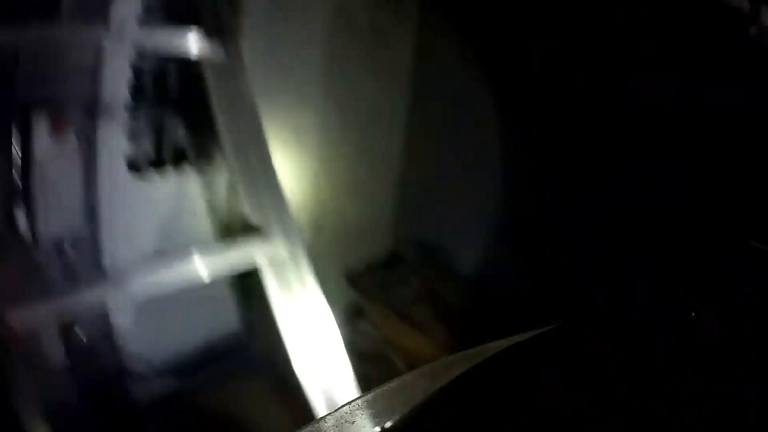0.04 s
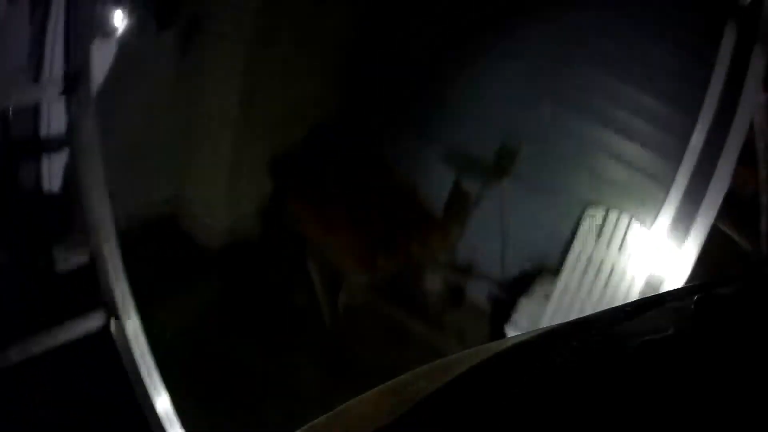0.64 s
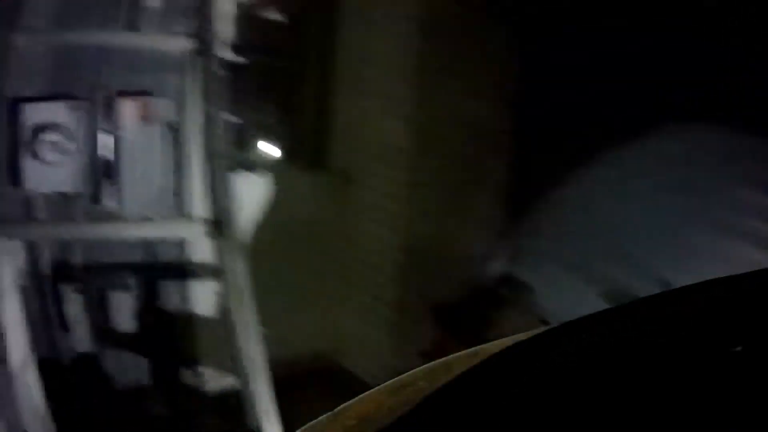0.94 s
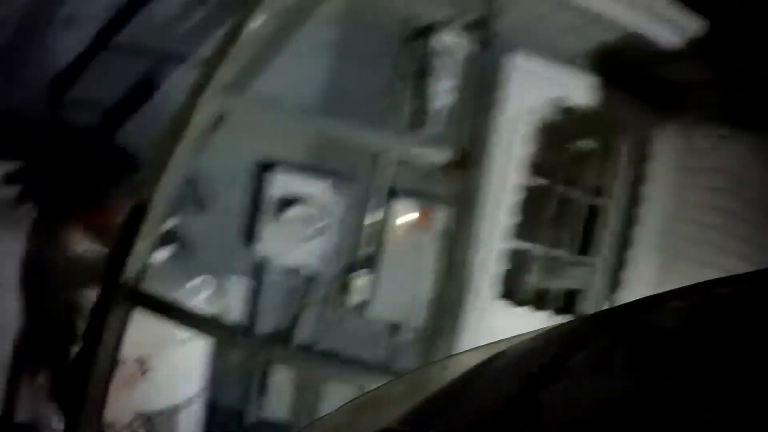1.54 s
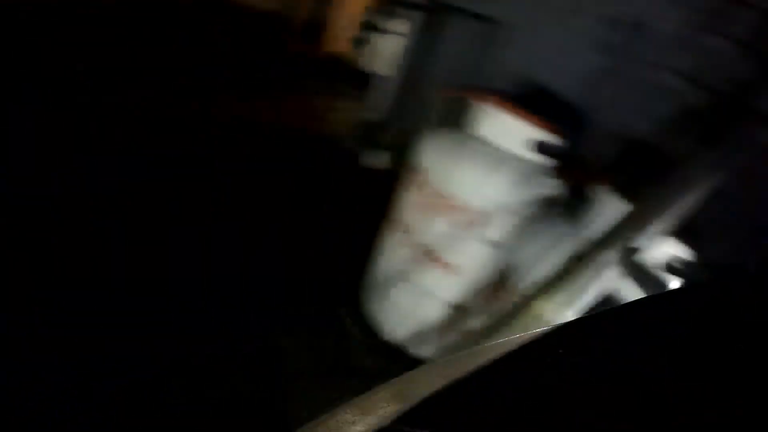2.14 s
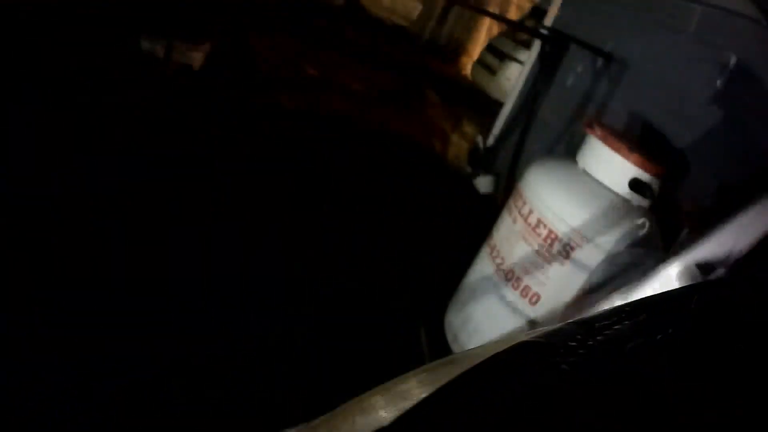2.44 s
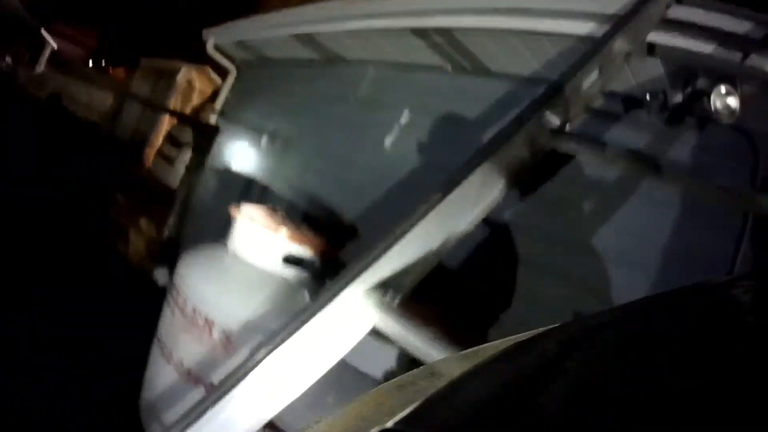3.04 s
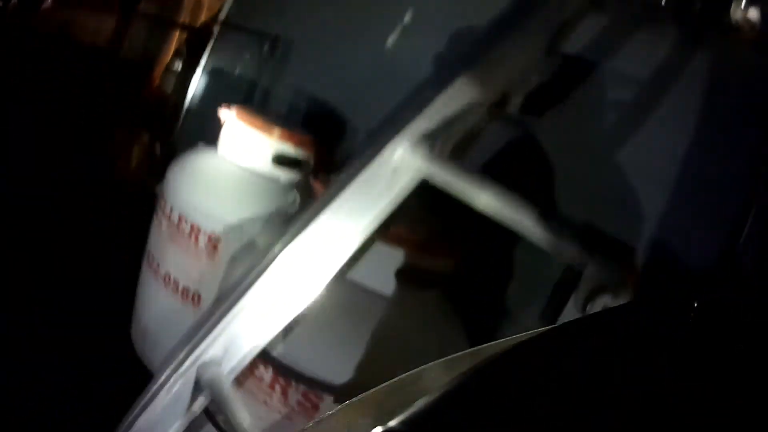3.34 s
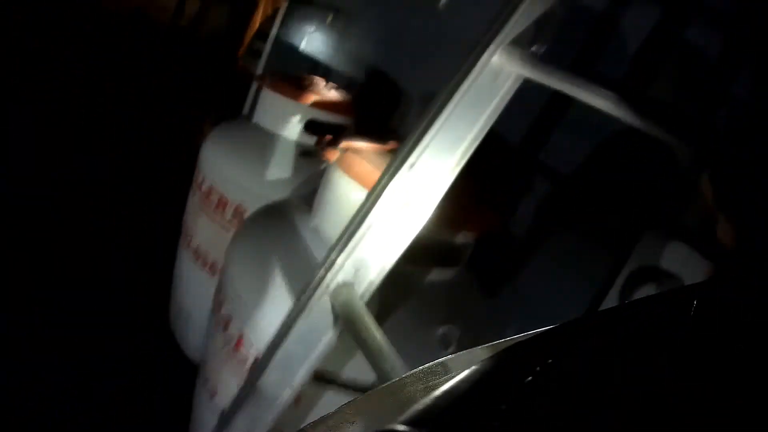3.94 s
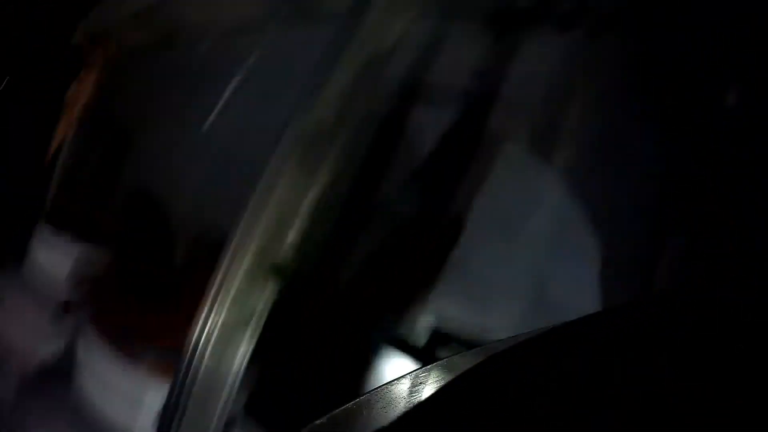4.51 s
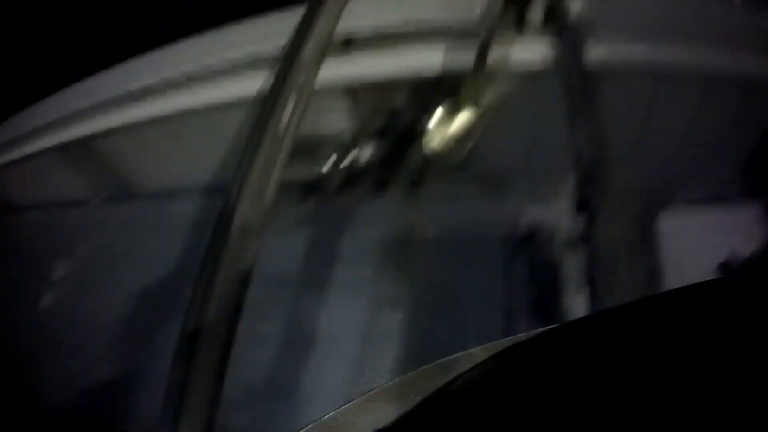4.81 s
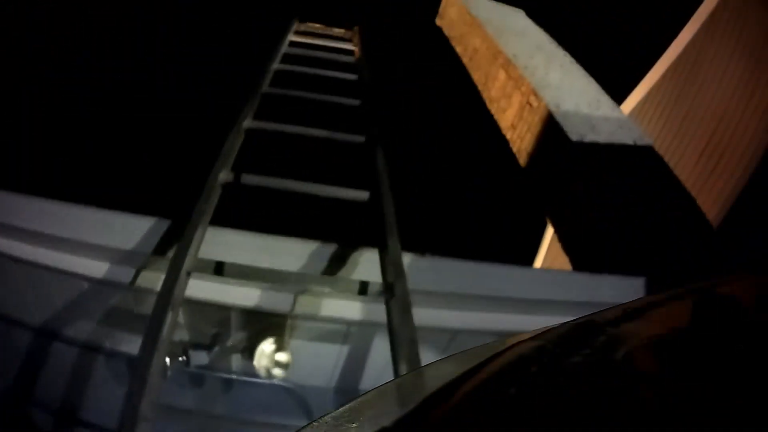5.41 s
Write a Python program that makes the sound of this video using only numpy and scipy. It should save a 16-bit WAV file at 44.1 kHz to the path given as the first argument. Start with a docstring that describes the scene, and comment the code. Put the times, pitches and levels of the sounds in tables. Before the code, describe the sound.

A truck idles some way off throughout, a low hum under faint outdoor hiss. In the first half second an aluminium extension ladder clanks lightly several times, with a dull bump and a faint squeak. A quieter stretch follows, with a small clank near 1.3 seconds and dry plastic clicks from the helmet mount beside the microphone. At 2 seconds the mount creaks and a latch drops and rings. From 2.5 seconds the ladder sections clatter and slide with a dull scrape. The loudest clank lands at about 3.6 seconds, starting a dense run of rattling, thuds and brief rough squeaks, peaking again near 4.3 and stopping by 4.5. Two more thudding clanks and a squeak come around 4.8 to 4.9, and a second latch rings just after 5. The engine and a small click remain until about 5.6. The metal sounds hollow through the microphone's case, with a slight wall echo.

```python
"""A yard beside a house at night: an aluminium extension ladder is carried over and raised.
Its loose sections clank and chatter, the rails thud and slide, and latches drop and ring;
brief, rough squeaks come in between. We hear it from a cased camera on a helmet: the plastic
mount clicks close by, and the case gives the clanks and the yard air a hollow peak near 2 kHz.
A parked truck idles some way off."""
import sys
import numpy as np
from scipy import signal
from scipy.fft import rfft, irfft
from scipy.io import wavfile
from scipy.ndimage import uniform_filter1d

SR = 44100
rng = np.random.default_rng(int(sys.argv[2]) if len(sys.argv) > 2 else 0)


def output_pcm(signal):
    """Save a mono or channel-first signal as 16-bit PCM at the path in sys.argv[1].

    Samples are clipped to [-1, 1] before scaling.
    """
    pcm = np.clip(np.atleast_2d(signal).T, -1, 1) * 32767
    wavfile.write(sys.argv[1], SR, np.round(pcm).astype(np.int16))


N = 245490
TIME = np.arange(N) / SR
RING_TIME = TIME[:SR // 3]
ATTACK = 1100  # samples: a hit's level is set on its first 25 ms


def undb(db):
    """Decibels to gain."""
    return 10 ** (np.asarray(db) / 20)


def level(x, db, count=None):
    """Scale x so that its first count samples (all by default) have this rms level."""
    return x * undb(db) / np.sqrt(np.mean(x[:count] ** 2) + 1e-20)


def curves(table):
    """Fader curves, one value per sample, from rows that start with t/s."""
    times, *columns = np.transpose(table)
    return [np.interp(TIME, times, column) for column in columns]


def add(out, t, x):
    """Mix x into out at t seconds."""
    i = max(int(t * SR), 0)
    out[i:i + len(x)] += x[:max(N - i, 0)]


def colour(x, points):
    """Minimum-phase EQ through points of f/Hz, gain/dB."""
    hz, db = np.transpose(points)
    grid = np.maximum(np.fft.rfftfreq(4096, 1 / SR), 1)
    gain = undb(np.interp(np.log(grid), np.log(hz), db))
    cepstrum = irfft(np.log(gain))
    half = len(cepstrum) // 2
    cepstrum[1:half] *= 2
    cepstrum[half + 1:] = 0
    impulse = irfft(np.exp(rfft(cepstrum)))
    return signal.fftconvolve(x, impulse)[:len(x)]


def band(x, edges):
    """Steep band-pass between two edges in Hz."""
    return signal.sosfilt(signal.butter(4, edges, "band", fs=SR, output="sos"), x)


def walk(rate_hz):
    """Smooth random modulation with an rms of 1."""
    hold = int(SR / rate_hz)
    steps = np.repeat(rng.standard_normal(N // hold + 1), hold)
    return level(uniform_filter1d(uniform_filter1d(steps, hold), hold)[:N], 0)


def fade(t60):
    """Free decay, 60 dB down after t60 seconds."""
    return np.exp(-np.log(1000) * RING_TIME / max(t60, 1e-3))


def burst(envelope):
    """White noise under an envelope."""
    return rng.standard_normal(len(envelope)) * envelope


def ring(modes, scatter_db, detune, stretch=1):
    """One blow on a set of modes; where it lands decides how much each one takes."""
    out = np.zeros(len(RING_TIME))
    for hz, db, t60 in modes:
        strength, drift, polarity = rng.standard_normal(3)
        tone = np.sin(2 * np.pi * hz * (1 + detune * drift) * RING_TIME)
        out += undb(db + scatter_db * strength) * np.sign(polarity) * fade(t60 * stretch) * tone
    return out


def chatter(length, count=7):
    """Impulses of a first contact, then dwindling rebounds spread over length seconds."""
    when = (np.arange(count) + rng.random(count)) / count
    size = rng.uniform(0.37, 1, count) * rng.choice([-1, 1], count)
    push = np.zeros(int(length * SR) + 2)
    push[0] = 0.69
    push[(when * length * SR).astype(int)] += 0.65 * size * np.exp(-.5 * when)
    return push


# loose sections clashing: t/s, level/dB, extra treble of a hard contact/dB, chatter length/s
CLANKS = [(0.001, -33, 1, 0.0093), (0.067, -36, -0.5, .02), (0.173, -26.5, 3, .005),
          (0.187, -27.5, 8.5, 0.012), (0.361, -33.5, 2, .008), (0.395, -39.5, 10, .006),
          (0.434, -27, 4.5, 0.024), (1.277, -33.5, 6.5, 0.026), (1.314, -35.5, -6, 0.0038),
          (2.462, -23, -2, .006), (2.488, -27.5, -1, .004), (2.544, -29, 6, 0.011),
          (2.573, -29, -0.5, 0.034), (2.595, -36.5, 12, 0.019), (2.629, -28, -4, 0.013),
          (2.743, -39, 3, .006), (2.832, -32.5, -7.5, .013), (2.914, -22.5, -1, 0.0042),
          (3.011, -22, 2.5, 0.0069), (3.5673, -10, 7, 0.0099), (3.656, -23, 3, .014),
          (3.714, -24, 1.5, .01), (3.769, -22, -1, 0.016), (3.798, -20, 2.5, .014),
          (3.865, -30, 5.5, 0.0073), (3.894, -26, -2, .01), (3.92, -19.5, 3.5, .012),
          (3.931, -22, -1, .007), (3.987, -23.5, -1, 0.017), (4.042, -21.5, -3, .014),
          (4.086, -21.5, -3.5, .014), (4.149, -22, -2.5, 0.0062), (4.197, -23, -6.5, .022),
          (4.26, -30, -3, 0.0047), (4.27, -15, 4, 0.0097), (4.285, -14.5, -1.5, .019),
          (4.338, -27.5, 3, .014), (4.366, -20.5, -3.5, .01), (4.405, -29, 4.5, .014),
          (4.783, -23, 1.5, .016), (4.842, -34, 12, .012), (4.86, -25, 1.5, 0.014),
          (4.971, -40.5, 8, 0.024), (5.187, -47.5, 7.5, .006)]
# ring of rails and rungs: f/Hz, level/dB, t60/s before the clank shortens it
LADDER_MODES = [(1390, 0, .17), (1525, -1, .15), (1830, 1, .18), (1925, -1, .18), (1985, -1, .15),
                (2085, 0, .18), (2180, -1, .16), (2265, 1, .17), (2410, -1, .16), (2540, -1, .14),
                (2770, -2, .14), (3760, 1, .13), (4010, -1, .12), (4220, 1, .13), (4460, 1, .12),
                (5460, -1, .1), (5950, 0, .1), (6350, -1, .1)]
# a clank's body, ring, bright and top bands: low f/Hz, high f/Hz
CLANK_BANDS = [(750, 1650), (1650, 3250), (3250, 5200), (5200, 15000)]
# hollow colour of the camera case: f/Hz, gain/dB
CASE_EQ = [(600, -23), (980, -25), (1400, -12.5), (1680, -10.5), (2090, 2.5), (2550, -9), (3000, -20.5),
           (3270, -44), (3750, -18), (4400, -14.5), (5150, -36), (6300, -25), (7400, -39), (8100, -38.5),
           (9000, -56), (10100, -41), (11200, -68), (15500, -66)]


def clanks():
    """Sections clash and chatter on clear modes and a dense wash; force and hardness set the colour."""
    out = np.zeros(N)
    for t, db, hard_db, length in CLANKS:
        clear = ring(LADDER_MODES, scatter_db=3, detune=0.0068, stretch=0.414)
        dense = burst(fade(0.1176) + undb(2.5) * fade(0.0083))
        blow = level(colour(clear, CASE_EQ), -6.5, ATTACK) + level(colour(dense, CASE_EQ), 0, ATTACK)
        blow = signal.fftconvolve(blow, chatter(length))
        force_db = db + 23.5  # against an ordinary clank
        bumped = any(abs(t - thud_t) < .02 for thud_t, _ in THUDS)
        # more body when the whole ladder bumps, and in light grazes, which favour the ring less
        body_db = -15 + 7.5 * bumped + .55 * max(-force_db, 0)
        bright_db = -18.5 + hard_db
        # heavier blows stay in contact longer and lose top
        top_db = bright_db - 8.7 + .12 * hard_db - .4 * force_db
        crack = band(burst(fade(.04)), [2500, 4000])
        add(out, t, level(crack, db - 32 + force_db, ATTACK))  # grows with the square of the force
        for edges, band_db in zip(CLANK_BANDS, [body_db, 0, bright_db, top_db]):
            add(out, t, level(band(blow, edges), db + band_db, ATTACK))
    return out


# the whole ladder bumping: t/s, level/dB
THUDS = [(0.186, -24), (2.543, -24.5), (3.012, -36.5), (3.57, -18.5), (3.77, -31), (3.8, -18.5),
         (3.922, -23), (4.327, -23), (4.787, -24), (4.863, -19)]
# bending of the long rails: f/Hz, level/dB, t60/s
BEND_MODES = [(211, 0.5, 0.14), (264.5, -8.5, 0.44), (282.2, -5.5, 0.29), (330, -7.5, 0.097),
              (396.5, 3, 0.072), (480, 2.5, 0.13), (550.4, -0.5, 0.07), (635, -2.5, 0.16),
              (730, -15.5, 0.36)]
# dull grind of the rails, bumped or sliding: f/Hz, gain/dB
GRIND_EQ = [(150, -19.5), (260, -2.5), (350, 0), (410, -1), (495, -2.5), (575, -3.5), (655, -3), (730, -6),
            (820, -9), (1000, -43), (2000, -55), (6000, -89)]


def thuds():
    """Heavier bumps bend the long rails, with a dull crunch at the contact."""
    out = np.zeros(N)
    for t, db in THUDS:
        crunch = colour(burst(fade(0.16)), GRIND_EQ)
        bend = band(ring(BEND_MODES, scatter_db=0.5, detune=0.029), [120, 850])
        thud = level(bend, 0, ATTACK) + level(crunch, -4.5, ATTACK)
        add(out, t, level(thud, db, ATTACK))
    return out


# a latch dropping on a rung: t/s, level/dB, ping level/dB, time to seat/s, bounce gap/s
LATCHES = [(2.0368, -19.5, -37.5, .0034, .014), (5.067, -18, -32, 0.0067, 0.023)]


def latch_contacts():
    """Each latch touches, seats and bounces twice, ever weaker: yields t/s, level/dB, ping level/dB."""
    for t, db, ping_db, seat, gap in LATCHES:
        yield t, db - 6, ping_db
        for bounce in range(3):
            yield t + seat + bounce * gap, db - 8 * bounce, ping_db - 13.5 * (bounce + 1)


# clear ring of a latch: f/Hz, level/dB, t60/s
LATCH_MODES = [(1510, -21, 0.15), (1873, 2.5, 0.11), (1924, -7, 0.14), (2090, -0.5, 0.1), (2124, 0, 0.15),
               (2271, 1, 0.044), (2410, -19, 0.12), (2670, -31, .11), (3820, -4.5, 0.024),
               (3840, -18, 0.062), (4240, -22, 0.21), (4450, -32, 0.1)]
# high ping of the steel catch, strongest on the first touch: f/Hz, level/dB, t60/s
PING_MODES = [(5455, -5, .05), (5680, -7, .04), (5900, 0, .08), (6000, -1, .06), (6350, -5, .045),
              (6600, -9, .04)]


def latches():
    """Small hard parts ring clearly over a short crack, with a ping and a snap on top."""
    out = np.zeros(N)
    for t, db, ping_db in latch_contacts():
        crack = level(colour(burst(fade(0.12)), CASE_EQ), db - 8.5, ATTACK)
        tone = level(ring(LATCH_MODES, scatter_db=1, detune=.003), db - 3.5, ATTACK)
        add(out, t, band(tone + crack, [1450, 11000]))
        snap = band(burst(fade(0.024)), [5200, 7200])
        ping = band(ring(PING_MODES, scatter_db=1, detune=.004), [4800, 7500])
        add(out, t, level(ping, ping_db - 0.5, ATTACK) + level(snap, ping_db - 11.5, ATTACK))
    return out


# brief high squeaks: t/s, length/s, level/dB
SQUEAKS = [(0.2, .053, -39.5), (0.589, 0.085, -46), (3.852, 0.076, -34), (3.977, 0.062, -39.5),
           (4.39, 0.059, -41), (4.913, 0.05, -33.5)]
# harmonics of a squeak: multiple, level/dB
SQUEAK_HARMONICS = [(1, -4.5), (2, -7), (3, -11), (4, -28.5)]


def squeaks(pitch_hz=2100):
    """Brief, rough high squeaks near 2.1 kHz: pitch and strength both shudder, over a noisy rasp."""
    out = np.zeros(N)
    phase = 2 * np.pi * pitch_hz * np.cumsum(1 + 0.0165 * walk(900)) / SR
    rasp = band(rng.standard_normal(N), [2400, 12000])
    rasp = level(colour(rasp, CASE_EQ), -0.97)
    for t, length, db in SQUEAKS:
        now = (TIME > t) & (TIME < t + length)
        swell = np.sin(np.pi * (TIME[now] - t) / length)
        tone = sum(undb(tone_db) * np.sin(k * phase[now]) for k, tone_db in SQUEAK_HARMONICS)
        out[now] += undb(db) * swell * (tone + rasp[now])
    return out * undb(2 * walk(800))


# fader rides for the sections sliding over each other: t/s, rattle gain/dB, scrape gain/dB
SLIDE_FADERS = [(0, -27.5, -27), (0.08, -38, -39.5), (0.37, -36.5, -34), (0.68, -47, -48), (1.3, -47, -46),
                (1.64, -52, -50), (2.39, -46.5, -46.5), (2.63, -31.5, -30.5), (2.85, -41, -41),
                (3.18, -31.5, -26.5), (3.42, -35, -30), (3.7, -29.5, -32.5), (4.27, -37, -35.5),
                (4.42, -30.5, -34), (4.51, -53, -49.5), (4.98, -39, -42), (5.13, -53, -43),
                (5.57, -58, -51)]
# hollow tones of the sliding rails: f/Hz, level/dB, t60/s
HOLLOW_MODES = [(350, -5, .06), (490, -2, .06), (660, 0, .05)]


def sliding(catches_per_s=220):
    """Dense tiny catches rattle the sections; rubbing grinds the rails and feeds their hollow tones."""
    rattle_db, scrape_db = curves(SLIDE_FADERS)
    catches = (rng.random(N) < catches_per_s / SR) * rng.exponential(size=N)
    energy = signal.fftconvolve(catches, fade(0.18) ** 2)[:N]
    rattle = colour(burst(np.sqrt(np.abs(energy))), CASE_EQ)
    # light contacts are duller than blows
    rattle = colour(rattle, [(1400, 7.5), (2300, -1), (3000, -2), (4000, -9.5), (8000, -6.5)])
    rubbing = rng.standard_normal(N) * undb(3.6 * walk(45))
    rail_ring = band(ring(HOLLOW_MODES, scatter_db=0, detune=0), [250, 780])
    hollow = signal.fftconvolve(rubbing, rail_ring)[:N]
    grind = colour(rng.standard_normal(N), GRIND_EQ)
    scrape = level(grind, -5) + level(hollow, -6.5)
    return level(rattle, -1) * undb(rattle_db) + scrape * undb(scrape_db)


# the helmet mount giving way: t/s, level/dB, creak length/s
MOUNT_CLICKS = [(0.197, -21.5, 0.0019), (0.673, -29.5, 0.00086), (1.335, -25.5, 0), (1.417, -32, 0.0022),
                (1.527, -38, 0.00061), (1.652, -37.5, 0), (1.954, -22, 0.014), (2.128, -35.5, 0.0014),
                (2.345, -30.5, 0.0018), (2.437, -40, 0.0014), (2.514, -34, 0), (2.98, -31, 0.0027),
                (3.146, -30, 0.0033), (3.197, -34, 0), (3.299, -40, 0.0016), (3.428, -31, 0),
                (3.632, -24, 0.0051), (3.897, -23, 0.0067), (4.149, -25.5, 0), (4.385, -38, 0.00017),
                (4.549, -32, 0.0019), (4.593, -35.5, 0.0012), (4.647, -33, 0.0011), (4.695, -33, 0.00091),
                (5.297, -33.5, 0.00066)]
# tock of its stiff plastic: f/Hz, level/dB, t60/s
MOUNT_MODES = [(606.6, -11, 0.19), (1360, -4.5, 0.014), (1477, 1, 0.04), (1490, -0.5, 0.023),
               (1750, -9, 0.024), (2320, -18, .02)]
# its dry crackle: f/Hz, gain/dB
CRACKLE_EQ = [(300, -9.5), (900, -1.5), (1450, 2.5), (2300, -1), (3100, -27.5), (4300, -20), (5400, -32),
              (6700, -22.5), (8500, -43), (15000, -44)]


def mount_clicks(step_s=.0035, swell_db=1.9):
    """Dry, dead clicks right beside the microphone, alone or in a run that swells into a creak."""
    out = np.zeros(N)
    for t, db, length in MOUNT_CLICKS:
        steps = int(length / step_s)
        for step in range(steps + 1):
            tock = band(ring(MOUNT_MODES, scatter_db=7, detune=0.039), [400, 2700])
            crackle = colour(burst(fade(0.1) + undb(10) * fade(0.0039)), CRACKLE_EQ)
            click = level(tock, -4, count=350) + level(crackle, -7, count=350)
            add(out, t + step * step_s, click * undb(db - (steps - step) * swell_db))
    return out


def wall_echo(send, predelay_s=.018, t60=0.34):
    """The house wall and the ground throw a little of the sound back, duller than it left."""
    tail = burst(fade(t60)) * (RING_TIME > predelay_s)
    tail = colour(tail / np.linalg.norm(tail), [(300, -13), (2000, -11.5), (6000, -20)])
    return signal.fftconvolve(send, tail)[:N]


# shading of the truck as the head turns: t/s, firing tone gain/dB, rumble gain/dB
TRUCK_FADERS = [(0.0, -39, -33), (0.06, -35, -34), (2.23, -40, -38), (3.86, -38.5, -38.5),
                (4.65, -38, -38.5), (5.02, -38, -35.5), (5.05, -34.5, -36.5), (5.57, -37, -36.5)]
# engine rumble: f/Hz, gain/dB
RUMBLE_EQ = [(20, -4.5), (40, -5.5), (60, -1), (90, -2.5), (135, 0), (180, 4), (280, 0), (400, -1.5),
             (520, -7.5), (700, -23), (1000, -45.5), (4000, -84)]
# wavering tones of the truck's machinery: f/Hz, level/dB
TRUCK_DRONES = [(164, -49), (188, -56), (219, -48.5), (274.5, -45)]


def truck(firing_hz=62.45, waver_db=5):
    """An idling engine: a firing tone, a rumble that throbs with it, and slowly swelling drones."""
    hum_db, rumble_db = curves(TRUCK_FADERS)
    phase = 2 * np.pi * firing_hz * TIME + .1 * walk(4.4)
    hum = level(np.sin(phase), 0) * undb(hum_db + 1.6 * walk(5.4))
    rumble = colour(burst(1 + 0.16 * np.sin(phase)), RUMBLE_EQ)
    drones = np.zeros(N)
    for hz, db in TRUCK_DRONES:
        tone = np.sin(2 * np.pi * hz * TIME + 1.04 * walk(9))
        drones += level(tone * undb(waver_db * walk(6.02)), db)
    return hum + level(rumble, 2) * undb(rumble_db) + drones


# yard air heard through the case: f/Hz, gain/dB
AIR_EQ = [(700, -5), (950, -14.5), (1400, -8), (1900, 1), (2030, 3), (2170, -8.5), (2600, -17), (3200, -29),
          (4300, -21), (5000, -27), (6100, -27), (7500, -31.5), (10000, -33), (15000, -35.5)]


def yard_air():
    """A faint, steady bed of hiss fills the yard."""
    hiss = colour(rng.standard_normal(N), AIR_EQ)
    return level(band(hiss, [600, 17000]), -46)


def scene():
    """Mono mix: hits and squeaks with their echo; mount, sliding, truck and air stay dry."""
    foreground = clanks() + thuds() + latches() + squeaks()
    return (foreground + wall_echo(foreground) + mount_clicks() + sliding() + truck() + yard_air())[None]


def record(dry, cutoff_hz=15250):
    """The camera clips the hardest peaks and cuts the top steeply."""
    clipped = np.clip(dry, -.95, .95)
    return signal.sosfilt(signal.ellip(8, .2, 70, cutoff_hz, fs=SR, output="sos"), clipped)


dry = scene()
out = record(dry)
output_pcm(out)
```